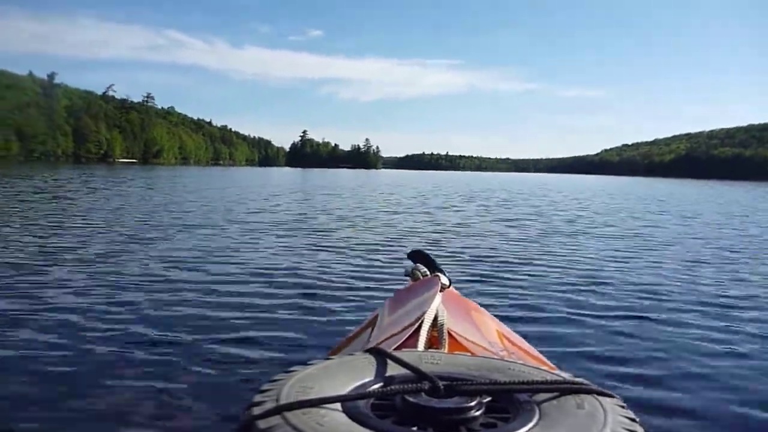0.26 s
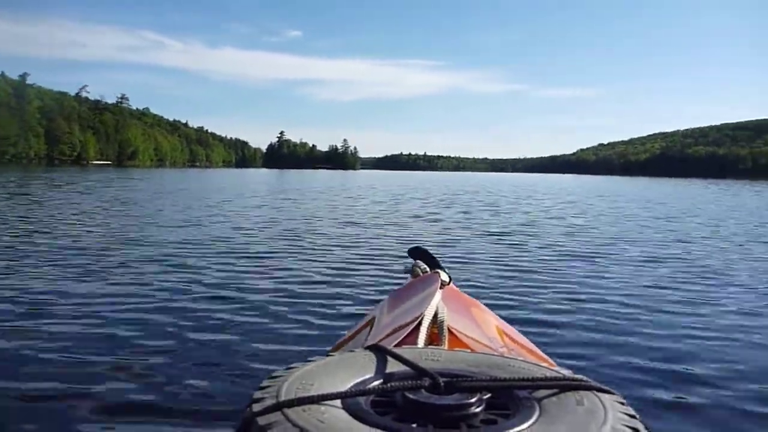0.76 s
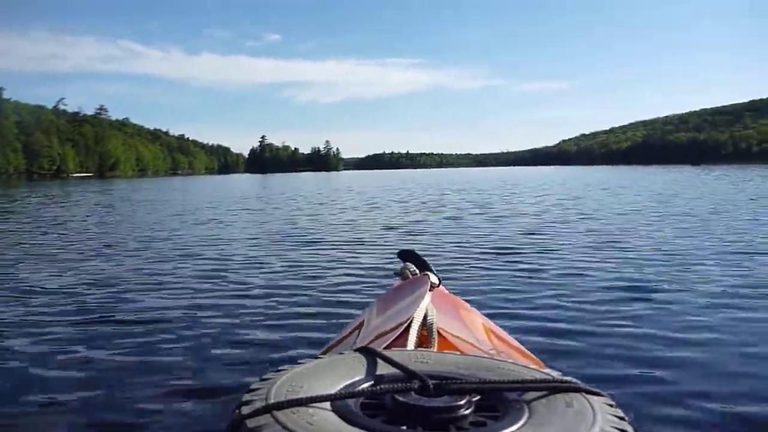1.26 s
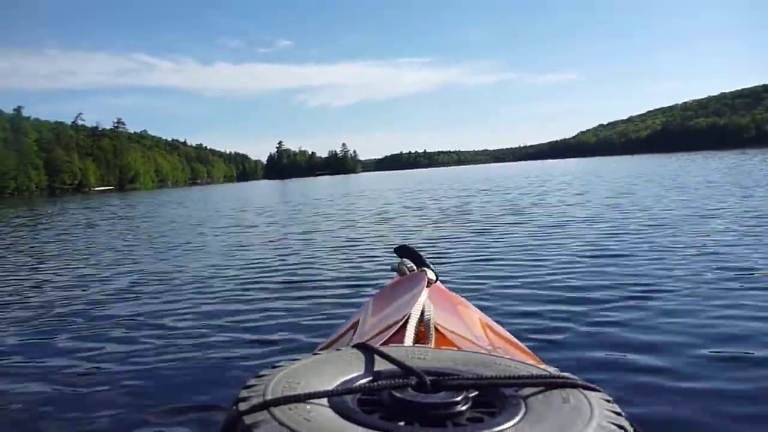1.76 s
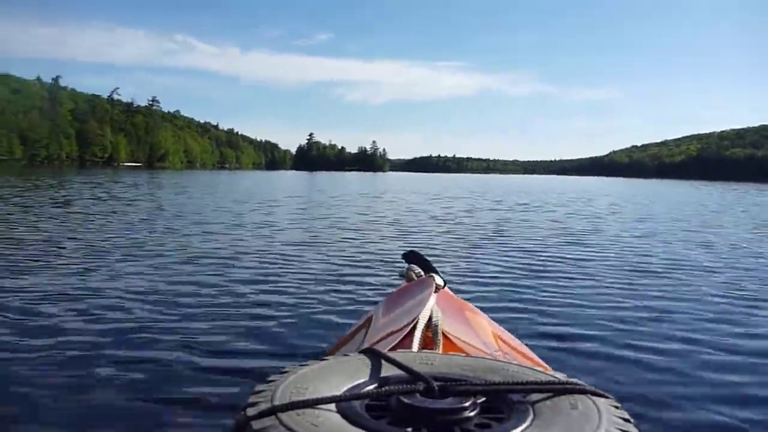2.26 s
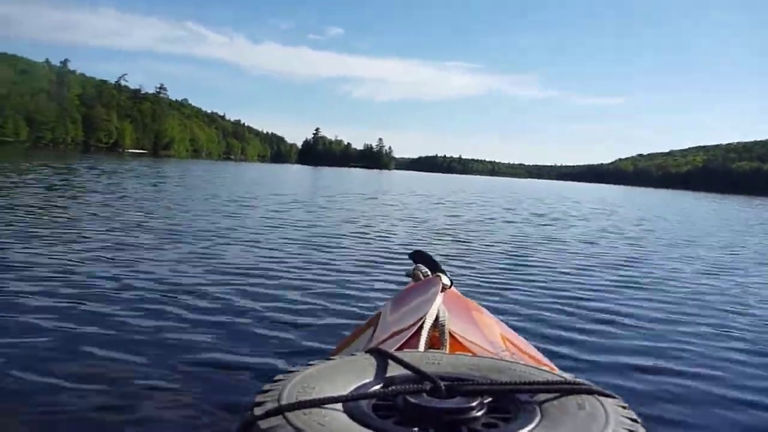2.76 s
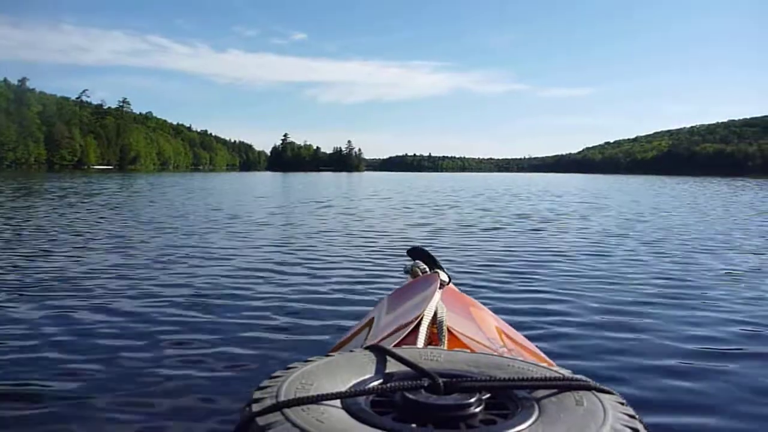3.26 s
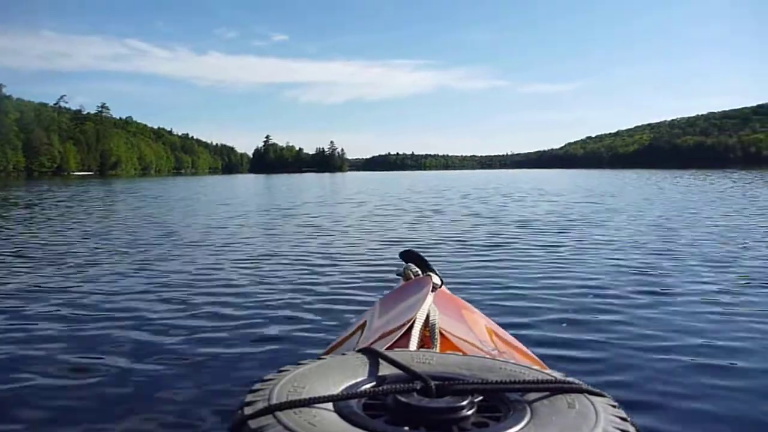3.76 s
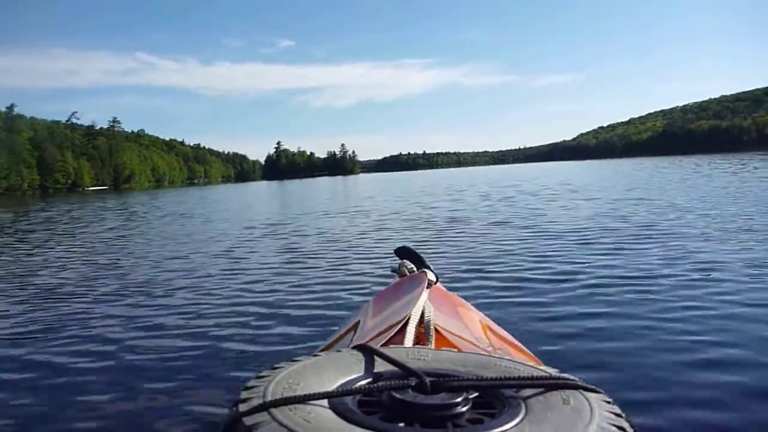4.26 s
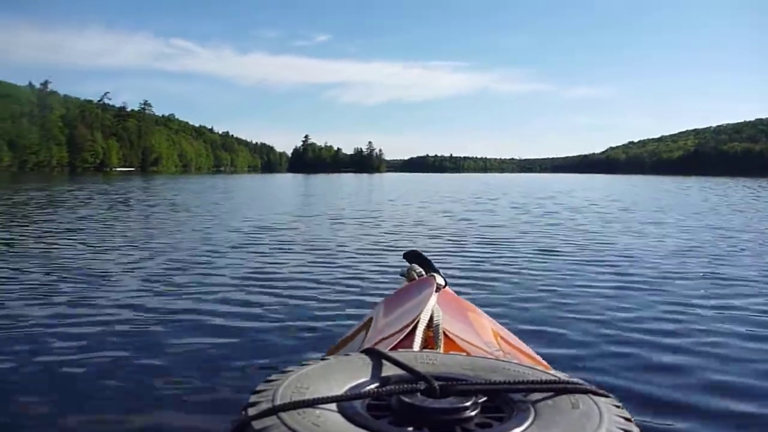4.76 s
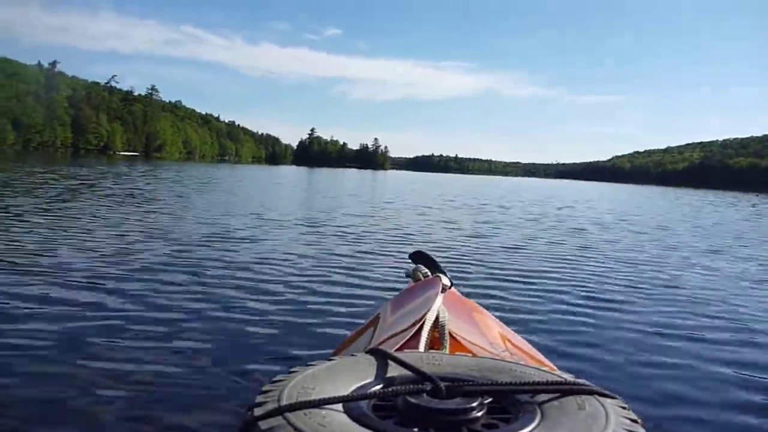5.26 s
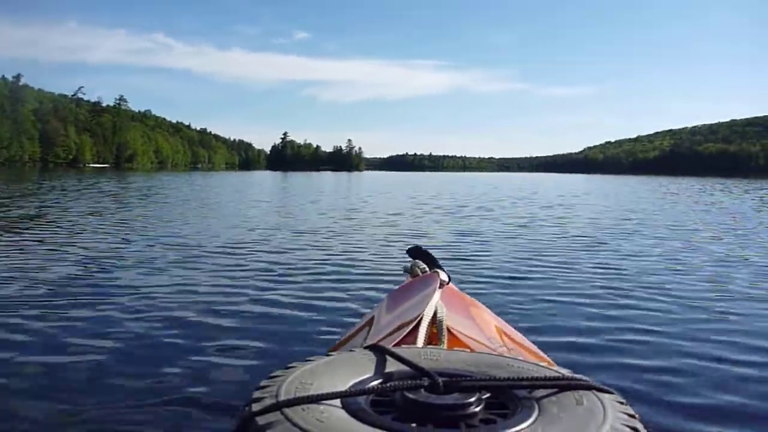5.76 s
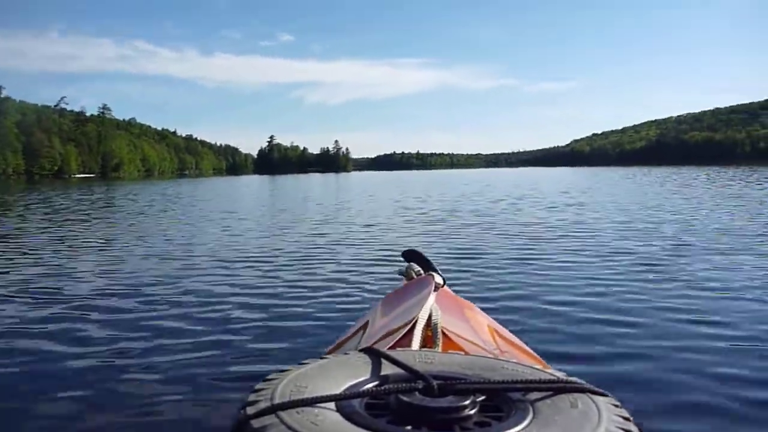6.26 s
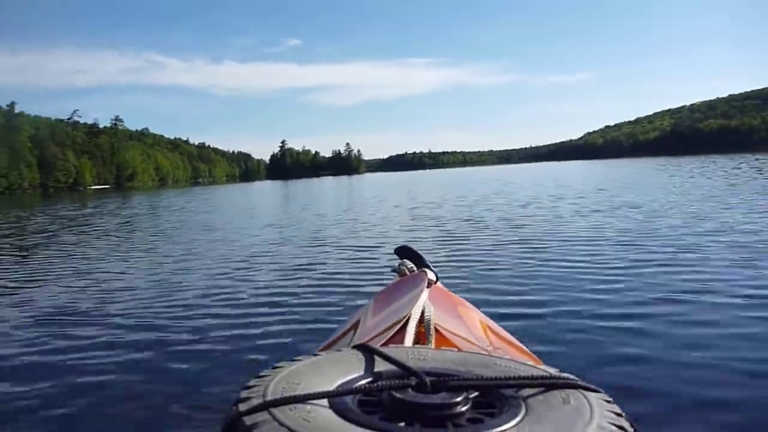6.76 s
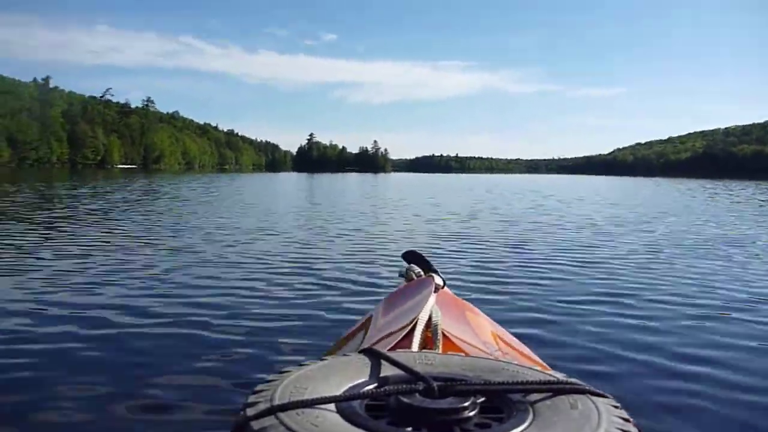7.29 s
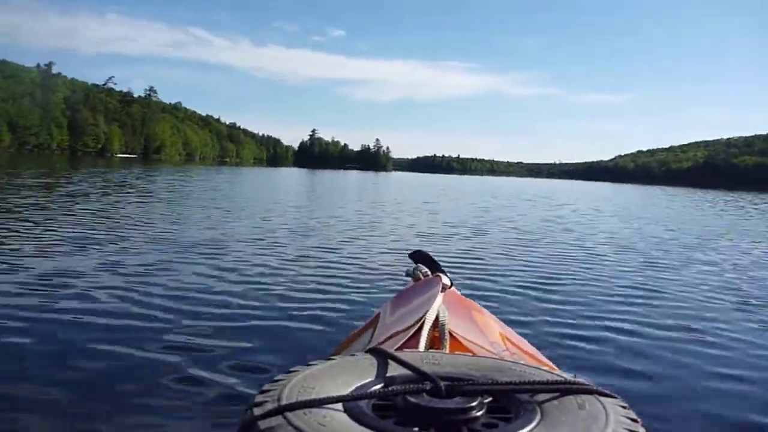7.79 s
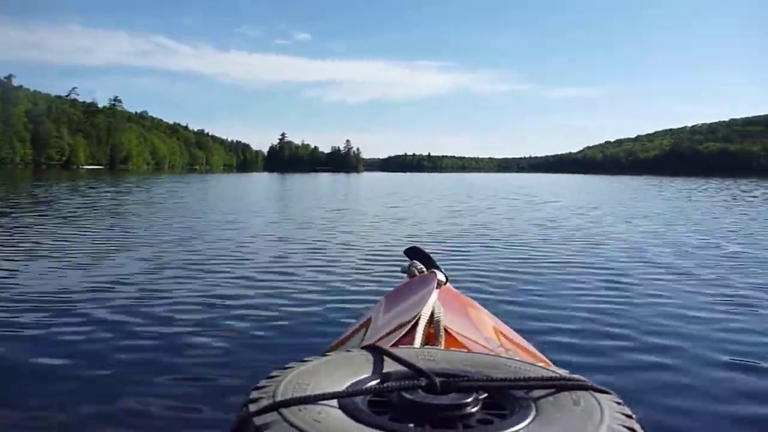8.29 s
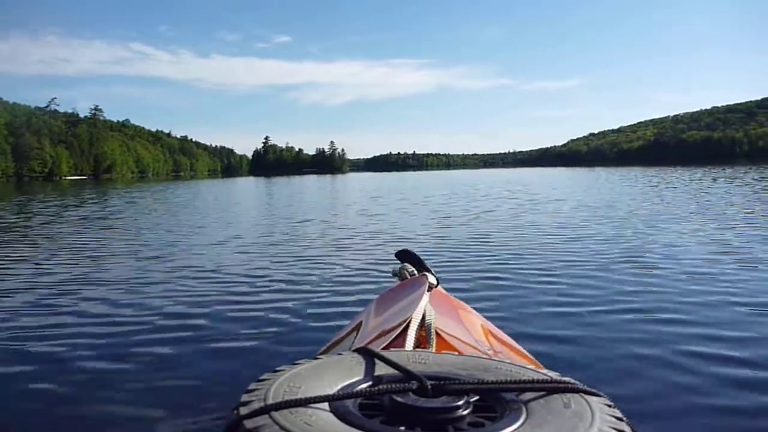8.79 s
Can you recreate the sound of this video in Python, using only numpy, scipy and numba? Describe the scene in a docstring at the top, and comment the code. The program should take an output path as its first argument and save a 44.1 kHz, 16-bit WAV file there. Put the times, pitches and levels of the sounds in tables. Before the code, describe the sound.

Steady close water sounds from a kayak's deck: a faint bow hiss and tiny hull trickles, over which paddle strokes swell and subside. Bubbles gulp, gurgle and fizz with mostly rising pitches; bright droplets plink and smack water and plastic. After one loud shaft knock early on, strokes continue evenly, with sharper splashes near four, five, six and seven and a half seconds. Open air, no echo, small midrange-heavy mono microphone.

```python
"""Kayak strokes on a calm lake

A kayak glides along; a small microphone on deck, close to the water, hears each paddle stroke.
The blade drags air under: sums of short gliding tones make gulps, gurgles, fizz and spray.
Drops smack the water and hull as ringing tones and noise bursts; the shaft hits the hull once.
Shaped noise makes the bow wave, hissing softly throughout."""
import sys
import numpy as np
from scipy import signal
from scipy.fft import rfft, irfft
from scipy.io import wavfile
from scipy.ndimage import uniform_filter1d, map_coordinates
from numba import njit

SR = 44100
rng = np.random.default_rng(int(sys.argv[2]) if len(sys.argv) > 2 else 0)


def to_wav(sig):
    """Store sig (one row per channel, or 1-D mono) as 16-bit WAV at the path in sys.argv[1].

    Samples outside -1..1 are clipped; the rate is SR.
    """
    pcm = np.clip(np.atleast_2d(sig), -1, 1) * 32767
    pcm = np.round(pcm).astype(np.int16)
    wavfile.write(sys.argv[1], SR, pcm.T)  # frames by channels


N = 398223

# Single bubbles that stand out: (start t/s, start f/Hz, glide/octaves, length/ms, level/dB)
CLEAR_BUBBLES = [(.033, 980, -0.21, 8.7, -28.5), (.085, 1066, -0.11, 13, -27), (.113, 1400, 1, 9.6, -30),
                 (.125, 523, 0.5, 4.4, -23), (.125, 815, 1.5, 9.6, -19), (.191, 780, -0.18, 6.7, -24),
                 (.483, 740, 0.19, 28, -29.5), (.482, 960, 0, 10, -24), (.564, 534, 1.26, 41, -26.5),
                 (.595, 776, -0.018, 26, -30.5), (.598, 1166, 0.27, 16, -26), (.624, 1050, -0.36, 12, -27),
                 (.647, 687, 0.18, 40, -30), (.678, 900, 0.3, 21, -21.5), (.783, 388, 0.74, 47, -26.5),
                 (.881, 456, -0.14, 38, -31.5), (.955, 286, 0.76, 82, -30), (1.033, 2470, 0.059, 11, -26),
                 (1.058, 328, .7, 60, -30.5), (1.06, 750, 0.24, 14, -28), (1.11, 1070, 0.069, 16, -29),
                 (1.128, 900, 0.88, 21, -35), (1.195, 1230, 0.2, 14, -31.5), (.95, 1320, 1, 9, -32),
                 (1.155, 990, 0.18, 24, -29), (1.224, 565, 1.2, 52, -26.5), (1.388, 540, 0.23, 31, -32.5),
                 (1.293, 570, 0.2, 19, -28), (1.048, 900, -.1, 14, -31), (.922, 2350, .1, 10, -31),
                 (1.583, 1460, 0.2, 21, -33), (2.03, 385, 1.6, 6.6, -26), (2.176, 307, 1.47, 116, -29.5),
                 (2.209, 1510, 0.32, 6.4, -20), (2.211, 1190, 0, 9.6, -23), (2.352, 365.6, 2, 100, -30.5),
                 (2.394, 496, -0.43, 29, -29), (2.397, 356, 0.81, 79, -29.5), (2.421, 1090, 0.38, 14, -27),
                 (2.553, 358, 1, 18, -28), (2.603, 862, 0.61, 45, -35.5), (2.81, 820, 0.5, 8.9, -34.5),
                 (3.098, 483, 1.3, 39, -37), (3.245, 536, 0.16, 42, -24.5), (3.256, 273, 1.14, 65, -19.5),
                 (3.396, 600, 0.33, 15, -31), (3.3, 950, 0.12, 16, -30), (3.478, 1100, 1.4, 10.5, -21.5),
                 (3.508, 850, 0.2, 17, -27), (3.564, 637, 0.68, 23, -30), (3.581, 700, 0.31, 27, -28.5),
                 (3.608, 795, 0.87, 9.9, -25), (3.612, 690, 0.65, 15, -25), (3.647, 378, 0.85, 29, -28),
                 (3.691, 458, 0.56, 32, -29), (3.859, 564, 0.44, 19.5, -25), (3.944, 1070, 0, 7.1, -31),
                 (4.452, 920, 0.58, 20, -27.5), (4.556, 600, 1.1, 36, -31.5), (4.57, 392, 0.69, 57, -33),
                 (4.757, 481, 1.4, 41, -33.5), (4.97, 441, 1.2, 85, -38), (4.65, 2155, .1, 9, -31.5),
                 (4.598, 2630, 0.089, 7.7, -26.5), (4.614, 2550, 0, 8, -29), (4.644, 900, 1, 16, -32),
                 (4.739, 1224, 0.096, 16, -25.5), (4.82, 640, .8, 39, -33), (4.84, 1030, 0.2, 21, -34),
                 (4.91, 750, .75, 32, -32), (4.863, 1460, -0.16, 15, -24.5), (4.91, 543, 0.6, 20, -30),
                 (5.306, 800, 0.51, 9.6, -26), (5.305, 970, 1.4, 10.5, -27), (5.412, 1270, 0.49, 5.9, -30),
                 (5.785, 444, 1.6, 25.7, -21), (5.786, 371, 0.91, 44, -24.5), (5.807, 1170, 1.1, 6.9, -24),
                 (5.81, 427, -0.29, 39, -29), (5.823, 570, 0.95, 24, -33.5), (5.845, 844, 1, 19, -26),
                 (5.846, 1187, 0.41, 16, -25.5), (5.896, 740, 0.45, 22, -22.5), (6.0, 940, 0.36, 29, -30.5),
                 (6.05, 331, 0.26, 130, -35), (6.026, 565, 1.6, 43, -26.5), (6.028, 720, 0.4, 11, -20.5),
                 (6.076, 726, 1, 26, -22.5), (6.334, 900, 0.4, 15, -27), (6.98, 273, 0.3, 18, -23),
                 (3.88, 260, 0.6, 24, -28), (6.988, 405, 0.54, 82, -36.5), (6.979, 370, 0.76, 19, -33),
                 (6.71, 757, -0.15, 75, -39.5), (6.712, 1340, 0.17, 25, -39), (6.73, 855, 0.5, 19, -37),
                 (6.842, 1280, 0.46, 14, -37), (6.91, 1013, 0.43, 32, -44), (4.212, 1540, .1, 8, -35),
                 (5.395, 824, 1.8, 11, -29), (5.997, 372, 0.64, 54, -32), (6.202, 465, 0.54, 59, -31.5),
                 (6.394, 496, 2, 51, -39), (6.859, 410, 0.76, 32, -32.5), (6.941, 439, 0.6, 52, -31.5),
                 (7.112, 725, 0.45, 52, -32), (7.228, 519, 1.8, 62, -31.5), (7.11, 448, 0.079, 75, -32.5),
                 (7.346, 1900, 0.21, 6.9, -35), (7.368, 1400, 0.92, 8.7, -41), (7.327, 489.6, .5, 88, -35),
                 (7.356, 485, 1.1, 63, -34), (7.985, 558, 0.92, 58, -37), (8.54, 685, 0.81, 43, -32.5),
                 (.907, 558, 1.06, 53, -34), (1.112, 427, 1.8, 57, -30), (1.845, 463, 0.69, 45, -31.5),
                 (2.97, 780, 1, 104, -42), (3.169, 393, -0.059, 56, -34.5), (5.411, 580, 2.3, 17, -33.5),
                 (5.594, 566, -0.37, 25, -36), (4.34, 324, 1.4, 64, -36.5), (2.03, 239, 1.1, 16, -27),
                 (.453, 373, -0.67, 50, -31), (.223, 800, -0.25, 51, -32.5), (7.068, 940, .4, 11, -28.5),
                 (7.154, 1190, 0.1, 10, -29), (7.186, 850, .5, 12, -29), (7.328, 2680, 0.2, 12, -28.5),
                 (7.518, 2330, 0.78, 9.4, -30), (7.519, 547, 0.22, 13, -27.5), (7.638, 964, 1.6, 24, -32),
                 (7.656, 1010, 1.7, 8.5, -26), (7.695, 501, 1.4, 45, -33.5), (8.024, 647, 1.9, 30, -30.5),
                 (8.108, 325.5, 1.1, 56, -31.5), (8.222, 1830, 1.2, 8, -25), (8.224, 1160, 0.96, 21, -28.5),
                 (8.234, 2640, 0.16, 10, -24), (8.239, 473, 0.42, 20, -27.5), (8.312, 718, 0.32, 16, -23),
                 (8.411, 685, 0.3, 17, -17.5), (8.414, 513, 0.11, 22, -21.5), (8.498, 910, 0.5, 8.5, -23),
                 (8.5, 269, 1.07, 97, -28.5), (8.041, 480, -0.067, 41, -35), (1.609, 573, 0.38, 50, -39.5),
                 (8.725, 789, 0.36, 23, -28), (8.737, 1420, 0.74, 11, -29), (8.747, 925, 0.19, 18, -27.5),
                 (8.842, 1900, .1, 8, -27), (8.886, 1740, 0.28, 15, -30), (8.813, 1800, 0, 16, -32),
                 (8.716, 1230, 0, 12, -30)]
# Drops and slaps: (t/s, ring peak level/dB, ring f/Hz, hull knock re ring level/dB, splat re ring level/dB)
WATER_DROPS = [(0.0812, -25.5, 2740, -18, -21), (0.1151, -27, 1650, -16, -22), (0.1306, -8, 2490, -7, -22),
               (0.145, -23, 1880, -1, -4), (0.1914, -27, 2580, -2.5, -13), (0.4812, -29, 1300, 1, -20),
               (0.5824, -42, 4300, -23, -13), (0.653, -40, 4500, -27, -12), (0.85, -35, 4540, -24, -12),
               (0.8736, -34, 4170, -25, -12), (0.884, -28.5, 4700, -25, -8), (1.034, -32, 2530, -11, -21),
               (1.1912, -31, 3570, -27, -15), (1.264, -23, 2570, -23, -10), (1.3578, -39, 2020, -12, -15),
               (1.452, -25, 2500, -20, -23), (1.6758, -35, 1950, -13, -19), (2.031, -21.5, 1320, -5, -22),
               (2.0712, -29.5, 3460, -28, -15), (2.105, -23.5, 1880, -14, -25),
               (2.2088, -24.5, 1200, 3, -29), (2.432, -25.5, 2060, -10, -27),
               (2.5656, -22.5, 2500, -4, -23), (2.717, -33, 2610, -8, -18), (3.121, -33, 3100, -18, -16),
               (3.138, -32, 3100, -20, -15), (3.246, -24, 2600, -12, -9), (3.439, -31, 2800, -20, -15),
               (3.536, -32, 3140, -20, -10), (3.2867, -27.5, 3900, -21, -20), (3.332, -27.5, 3060, -15, -9),
               (3.387, -25, 2680, -15, -8), (3.322, -21.5, 2820, -19, 1), (3.475, -22, 1550, -11, -22),
               (3.638, -31, 4000, -20, -15), (3.6601, -31, 4200, -17, -19), (3.766, -28, 2720, -15, -11),
               (3.7969, -17, 2080, -7, -9), (3.859, -27, 3200, -20, -16), (3.8795, -10.5, 2120, -6, -16),
               (3.8965, -19.5, 1360, -25, -16), (3.914, -24, 3980, -20, -15),
               (4.144, -38.5, 4200, -30, -12), (4.1553, -27.5, 3100, -18, -23),
               (4.596, -24, 2780, -17, -26), (4.615, -25.5, 1230, -10, -22),
               (5.0025, -31.5, 6750, -25, -10), (5.0984, -9, 2510, 0, -15), (5.1096, -14, 1440, -4, -23),
               (5.121, -17, 1480, -25, -20), (5.157, -26, 2120, -16, -25), (5.201, -31, 2880, -13, -18),
               (5.24, -30, 2700, -20, -16), (5.306, -31, 1390, -10, -21), (5.7747, -25, 3220, -19, 2),
               (5.797, -29, 3300, -20, -11), (5.845, -21.5, 1270, -6, -15), (5.897, -32, 1000, -6, -17),
               (5.913, -29.5, 3830, -25, 0), (5.918, -31, 5130, -25, 2), (6.1005, -31.5, 3840, -22, -16),
               (6.2457, -18, 1500, -6, -19), (6.2857, -26.5, 4120, -21, -11),
               (6.3195, -23.5, 2950, -17, -5), (6.3499, -12.5, 1810, -15.5, -6),
               (6.3668, -18, 1850, -15, 11.5), (6.346, -18, 2640, -15, -14), (6.381, -46, 6530, -25, -4),
               (6.431, -39, 5000, -20, 1), (6.4996, -35.5, 3750, -25, -15), (6.6086, -32, 4330, -28, -15),
               (6.636, -30, 3200, -25, -20), (6.648, -24.5, 2680, -20, -16), (6.725, -36, 3900, -29, -20),
               (6.842, -30, 2800, -8, -21), (7.329, -41, 2810, -9, -21), (7.3004, -33, 3180, -22, -33),
               (7.429, -29.5, 2600, -5, -13), (7.457, -24.5, 2010, -14, -24), (7.52, -18, 2570, -1, -21),
               (7.536, -21, 1490, -9, -21.5), (7.5553, -18, 1500, -12, 14), (7.5712, -8.5, 2570, -34, -21),
               (8.2178, -27, 3290, -25, -15), (8.224, -22, 2420, -2, -20), (8.314, -29, 2030, -3, -24),
               (8.352, -22, 2010, -6, -9), (8.387, -33, 4500, -22, -20), (8.4132, -24, 3060, -10, -12),
               (8.484, -30.5, 3800, -12, -12), (8.498, -22.5, 1280, -6, -18), (8.544, -37, 4400, -23, -10),
               (8.7214, -30, 3380, -22.5, -8), (8.739, -23.5, 4500, -10, -10), (8.776, -27, 3570, -25, -15),
               (8.788, -31, 2600, -13, -5), (8.529, -42, 3910, -22, -12), (8.8233, -33, 3750, -23, -15),
               (8.842, -26, 1940, -16, -17), (8.8757, -21, 3850, -18.5, -9)]
# Ringing modes of the plastic hull: (f/Hz, relative level/dB, t60/s)
HULL_MODES = [(494, 0, 0.038), (1120, 3.5, 0.0097), (1804, -0.5, 0.016), (3730, -14.5, 0.013)]
# Relative spectrum of the bow wave: (f/Hz, level per Hz/dB)
BOW_SPECTRUM = [(100, -24.5), (250, -10), (400, -21.5), (700, -3), (1700, -14.5), (2800, -8.5), (3800, -33),
                (4700, -22), (6500, -28), (8000, -20)]
# Sheets of spray off the blade: (t/s, level/dB, fade time constant/ms)
SPRAY_SHEETS = [(0.125, -39.5, 43), (1.25, -41.5, 73), (1.344, -34, 29), (3.789, -39, 13), (3.858, -34, 16),
                (3.876, -28.5, 19), (5.098, -39.5, 58), (6.238, -33, 15), (6.316, -36.5, 38),
                (6.349, -31.5, 20), (7.55, -36.5, 26), (8.719, -34, 15), (8.84, -32.5, 66)]
# Shaft blow: (crack level before its ramp/dB, crack f/Hz, hull ring gain/dB)
SHAFT_BLOW = (-1.55, 1490, -10.5)
# Level curves of the paddle strokes, left and right in turn; corner times may fall out of order:
# (gurgle start t/s, fizz and mist corner t/s, pocket end t/s, gurgle and fizz end t/s,
#  pockets level/dB, gurgle level/dB, fizz at corner level/dB, fizz at inner corner level/dB,
#  fizz at end level/dB, gurgle and fizz between strokes level/dB)
PADDLE_STROKES = [(-0.4, -0.27, 0.39, 0.16, -53, -44.5, -42, -42.5, -40, -46.5),
                  (0.77, 1.04, 1.05, 1.304, -45, -41.5, -35, -45.5, -38, -49.5),
                  (1.942, 1.5, 2.42, 2.53, -46.5, -40, -44.5, -43, -42, -52),
                  (3.15, 3.5, 3.66, 3.96, -36.5, -40, -37.5, -44.5, -33, -55),
                  (4.42, 5, 4.33, 4.87, -41, -42.5, -42, -48.5, -41, -49),
                  (5.78, 6, 6, 6.34, -43.5, -42, -39.5, -39, -40, -52.5),
                  (7, 7, 6.9, 7.7, -52, -43, -41.5, -49.5, -42, -52),
                  (8.101, 8.3, 9.2, 8.86, -47, -41.5, -39, -42.5, -39.5, -47.5)]
# Spray re fizz, strokes on the far and on the near side: (far level/dB, near level/dB)
SIDE_SPRAY_DB = (-17.5, -15.5)
# Bright mist at the fizz and mist corner, one entry a stroke: (level/dB)
MIST_CORNER_DB = (-60, -55, -61, -55.5, -62, -53, -64.5, -55.5)

HISS_DB, HUSH_DB, TRICKLE_DB = -47.5, -84, -47.5
KNOCK_S = 2.5474
LEAD_S, DRAIN_S = 0.21, 0.15  # ramps ahead of the gurgle start and after the gurgle and fizz end
INNER_SHARE = 0.35  # place of the inner fizz corner between fizz corner and end
POCKET_FADE_S, POCKETS_CALM_DB, POCKETS_PATCHY_DB = 0.18, -59.5, 4
MIST_CALM_DB, MIST_RISE_S, MIST_FALL_S = -64.5, 0.52, 0.22
WOBBLE_MS, WOBBLE_HZ = 0.14, 90  # scale and rate of the path wander
SMALL_S, BIG_S = 0.018, 0.05  # lengths of brief and of long-lived bubbles
CRACKLE_DB = -12  # crisp ticks re spray
BASS_CUT_HZ, NOTCH_HZ, NOTCH_Q = 460, 5410, 9.7
CLIP_LEVEL, TOP_HZ = .71, 16500


def undb(db):
    """Turn decibels into an amplitude ratio."""
    return 10 ** (np.asarray(db) / 20)


def unit(x):
    """Scale to an RMS of 1."""
    return x / np.sqrt(np.mean(x ** 2))


def walk(rate):
    """Random levels held 1 / rate s and slewed twice; spread near 1."""
    hold = int(SR / rate)
    steps = np.repeat(rng.standard_normal(N // hold + 1), hold)
    return 1.52 * uniform_filter1d(uniform_filter1d(steps, hold), hold)[:N]


def waver(x):
    """A path that keeps changing length bends the pitch a little up and down."""
    path = np.arange(N) + WOBBLE_MS * SR / 1000 * walk(WOBBLE_HZ)
    return map_coordinates(x, [path], order=1, mode="nearest")


@njit
def chirps(start, hz, octaves, seconds, size, turn, swell, big):
    """Sum of gliding tones that swell and fade; big ones (1) hold on longer and glide mostly at the end."""
    out = np.zeros(N)
    for k in range(len(start)):
        n, first = int(seconds[k] * SR), int(start[k] * SR)
        step = 2 * np.pi * hz[k] / SR
        glide = np.log(2) * octaves[k] / n
        phase = turn[k]
        for i in range(min(n, N - first)):
            age = i / n
            fade = (1 - age) * (1 - (1 - big[k]) * age) / (1 + big[k] / 2)
            out[first + i] += size[k] * 2.5 * age ** swell * fade * np.sin(phase)
            phase += step
            step *= 1 + glide * (1 + big[k] * (2 * age - 1))
    return out


def bigness(seconds):
    """0 for brief bubbles, 1 for long-lived ones."""
    return np.clip((seconds - SMALL_S) / (BIG_S - SMALL_S), 0, 1)


def swarm(lo_hz, hi_hz, cycles, rise, spread_db, tilt_db, count):
    """Many small bubbles of random size; most are faint, a few stand out."""
    when, size, life, climb, luck, turn = rng.random((count, 6)).T
    hz = lo_hz * (hi_hz / lo_hz) ** size
    gain = undb(-spread_db * np.log(1.015 - luck) + tilt_db * size)
    seconds = cycles * (0.19 + 1.74 * life ** 2) / hz
    tones = chirps(when * N / SR, hz, rise * climb, seconds, gain, 2 * np.pi * turn, 0.41, bigness(seconds))
    return unit(tones)


def stroke_db():
    """Levels of pockets, gurgle, fizz and spray, interpolated between the corners of each stroke."""
    start, corner, pocket_end, end, gulp, gurgle, fizz, inner, last, after = np.transpose(PADDLE_STROKES)
    calm = np.full(len(start), POCKETS_CALM_DB)
    before = np.roll(after, 1)
    side = np.resize(SIDE_SPRAY_DB, len(start))
    pocket_times = (start - POCKET_FADE_S, start, pocket_end, pocket_end + POCKET_FADE_S)
    gurgle_times = (start - LEAD_S, start, end, end + DRAIN_S)
    froth_times = (start - LEAD_S, corner, corner + INNER_SHARE * (end - corner), end, end + DRAIN_S)
    froth_db = np.array((before, fizz, inner, last, after))
    curves = ((pocket_times, (calm, gulp, gulp, calm)),
              (gurgle_times, (before, gurgle, gurgle, after)),
              (froth_times, froth_db),
              (froth_times, froth_db + side))
    t = np.arange(N) / SR
    return [np.interp(t, np.ravel(s, "F"), np.ravel(db, "F")) for s, db in curves]


def bow_hiss():
    """Bow wave as shaped noise: its body swells with gurgle and fizz, its treble stays nearly even."""
    hz, db = np.transpose(BOW_SPECTRUM)
    f = np.maximum(np.arange(N // 2 + 1) * SR / N, 1)
    spectrum = rfft(rng.standard_normal(N)) * undb(np.interp(np.log(f), np.log(hz), db))
    hiss = irfft(spectrum, N)
    body = irfft(spectrum / (1 + (f / 3600) ** 6), N)
    effort_db = np.mean(stroke_db()[1:3], axis=0)  # gurgle and fizz
    swell = undb(0.47 * (effort_db - effort_db.mean()) + 2.7 * walk(5) + 2.4 * walk(30))
    return (hiss + (swell - 1) * body) / hiss.std() * undb(HISS_DB + 0.62 * walk(3))


def trickle():
    """Small drips and plops along the hull, never stopping, as a swarm of uneven level."""
    drips = swarm(422.2, 3300., 12., 0.7, 3.5, -0.56, count=4000)
    return undb(TRICKLE_DB) * drips * undb(3.06 * walk(8.3))


def hull_ring(t):
    """The plastic hull, struck, rings briefly in a few decaying modes."""
    modes = sum(undb(db) * np.sin(2 * np.pi * hz * t) * undb(-60 * t / t60) for hz, db, t60 in HULL_MODES)
    return modes * (1 - np.exp(-t / 0.00062))


def knock():
    """The shaft hits the hull: a single-cycle crack, then the hull rings."""
    crack_db, hz, ring_db = SHAFT_BLOW
    t = np.maximum(np.arange(N) / SR - KNOCK_S, 0)
    crack = np.sin(2 * np.pi * np.minimum(hz * t, 1)) * (0.56 + 0.62 * hz * t)
    return undb(crack_db) * crack + undb(ring_db) * hull_ring(np.maximum(t - 1 / hz, 0))


def drops():
    """A drop rings its small cavity for a few ms, smacks, knocks the hull and splats."""
    out, t = np.zeros(N + SR), np.arange(SR // 20) / SR
    hull = hull_ring(t)
    for s, db, hz, knock_db, splat_db in WATER_DROPS:
        noise = rng.standard_normal(len(t) + 1)
        ring = np.sin(2 * np.pi * hz * t) * (1 - np.exp(-t / 0.00023)) * np.exp(-t / 0.0016)
        smack_band = signal.butter(2, [0.31 * hz, 1.58 * hz], "band", fs=SR)
        smack = signal.lfilter(*smack_band, noise[1:] * np.exp(-t / 0.0022))
        splat = np.diff(noise) * np.exp(-t / 0.0011)  # differencing brightens the noise
        parts = ((ring, 0), (smack, -6), (hull, knock_db), (splat, splat_db))
        i = int(s * SR)
        out[i:i + len(t)] += sum(undb(db + rel_db) * x / np.abs(x).max() for x, rel_db in parts)
    return out[:N]


def mist():
    """Bright mist of small high bubbles, rising to and falling from one corner time of each stroke."""
    corner = np.transpose(PADDLE_STROKES)[1]
    calm = np.full(len(corner), MIST_CALM_DB)
    times = np.ravel((corner - MIST_RISE_S, corner, corner + MIST_FALL_S), "F")
    levels = np.ravel((calm, MIST_CORNER_DB, calm), "F")
    mist_db = np.interp(np.arange(N) / SR, times, levels)
    return swarm(3300., 5400., 9., 0.48, 2.5, -0.86, count=14000) * undb(mist_db + 3.7 * walk(45))


def spray_sheets(crackle):
    """Sheets of spray: dense high chirps and ticks that start sharply and fade exponentially."""
    t = np.arange(N) / SR
    envelope = np.zeros(N)
    for at, db, ms in SPRAY_SHEETS:
        i = int(at * SR)
        age = np.maximum(t[i:] - at, 0)[:SR // 2]
        envelope[i:][:len(age)] += undb(db) * np.minimum(age / 0.0021, 1) * np.exp(-1000 * age / ms)
    sheet = swarm(2050.0, 6660.0, 4.7, 0.34, 3.4, -1.2, count=16000) * undb(3.3 * walk(160))
    ticks = undb(-5.5) * np.roll(crackle, N // 3)  # shifted away from the ticks in the spray
    return envelope * (sheet + ticks)


def spray(level_db, surge, crackle):
    """Fine spray: very short high chirps with crisp ticks."""
    fine = swarm(3160.0, 7330.0, 5.5, 0.97, 4.4, -12.0, count=13000) * undb(0.66 * surge + 3.9 * walk(40))
    return undb(level_db) * (fine + undb(CRACKLE_DB) * crackle)


def fizz(level_db, surge):
    """Small bubbles fizz over a foam of tiny, densely packed bursts."""
    small = swarm(1263.0, 3650.0, 10.2, 0.3, 3.4, -0.35, count=9000) * undb(1.9 * surge + 2.16 * walk(45))
    foam = swarm(889.0, 3250.0, 6.0, 0.1, 4.2, 0.76, count=12000) * undb(1.4 * surge + 3.2 * walk(70))
    return undb(level_db) * (undb(-2.5) * small + undb(-3.0) * foam)


def gurgle(level_db, surge):
    """Middling bubbles gurgle among glugs with slow, long climbs; the heaving surface bends them."""
    glugs = swarm(310.1, 803.7, 26., 1.5, 3.1, -1.8, count=420)
    middling = swarm(402.2, 1487.0, 15.6, 0.7, 2.73, 1.0, count=2600) * undb(2.12 * surge + 1.5 * walk(40))
    return undb(level_db) * waver(middling + undb(-4.5) * glugs)


def gulps(level_db):
    """Big air pockets gulp in low, patchy rising tones."""
    pockets = swarm(230., 399.8, 12., 0.75, 4.0, 7.3, count=500)
    return undb(level_db) * pockets * undb(POCKETS_PATCHY_DB * walk(4.8))


def churn():
    """Air dragged under by the blade, from fizz and spray down to big pockets."""
    gulp_db, gurgle_db, fizz_db, spray_db = stroke_db()
    surge = walk(16)  # small waves break and free bubbles of several sizes together
    crackle = swarm(2500., 6500., 2.7, 0.3, 3.6, -6.5, count=1500)
    bright = mist() + spray_sheets(crackle) + spray(spray_db, surge, crackle)
    return bright + fizz(fizz_db, surge) + gurgle(gurgle_db, surge) + gulps(gulp_db)


def bubbles():
    """Single bubbles ring and glide, mostly upward as they near the surface, which shakes them."""
    s, hz, octaves, ms, db = np.transpose(CLEAR_BUBBLES)
    turn = 2 * np.pi * rng.random(len(s))
    tones = chirps(s, hz, octaves, ms / 1000, undb(db), turn, 0.3, bigness(ms / 1000))
    return waver(tones) * undb(2.45 * walk(140) - 0.2)


def scene():
    """Sum the bow wave, trickle, knock, drops and blade sounds in one channel."""
    return (bow_hiss() + trickle() + knock() + drops() + churn() + bubbles())[None]


def record(dry):
    """The small microphone loses bass and treble, with a faint low hush, and clips peaks."""
    x = signal.lfilter(*signal.butter(2, BASS_CUT_HZ, "high", fs=SR), dry)
    x = signal.lfilter(*signal.butter(2, 190, "high", fs=SR), x)
    hush = signal.lfilter(*signal.butter(2, [110, 230], "band", fs=SR), rng.standard_normal(N))
    x = x + undb(HUSH_DB + 4.4 * walk(5.7)) * unit(hush)
    # a narrow band is missing from the treble
    x = signal.lfilter(*signal.iirnotch(NOTCH_HZ, NOTCH_Q, fs=SR), x)
    x = signal.sosfilt(signal.butter(6, 6900, fs=SR, output="sos"), x)
    x = signal.sosfilt(signal.cheby2(8, 30, 7900, fs=SR, output="sos"), x)
    x = np.clip(x, -CLIP_LEVEL, CLIP_LEVEL)
    # a last low-pass trims the top of the clipped peaks' spectrum
    return signal.sosfilt(signal.ellip(8, .1, 60, TOP_HZ, fs=SR, output="sos"), x)


dry = scene()
out = record(dry)
to_wav(out)
```